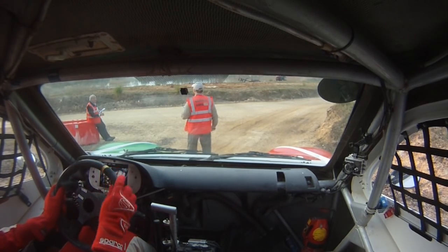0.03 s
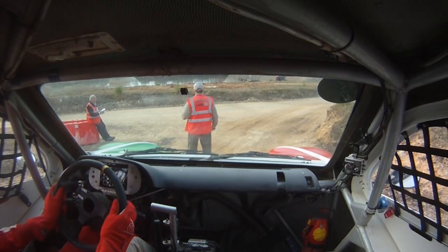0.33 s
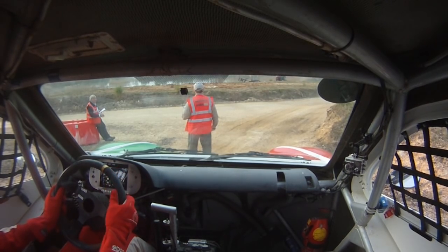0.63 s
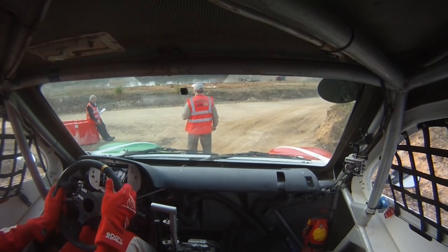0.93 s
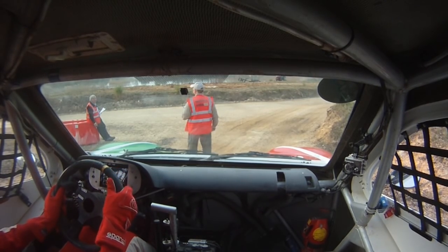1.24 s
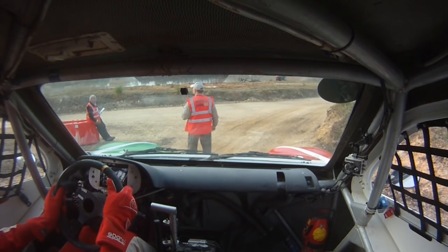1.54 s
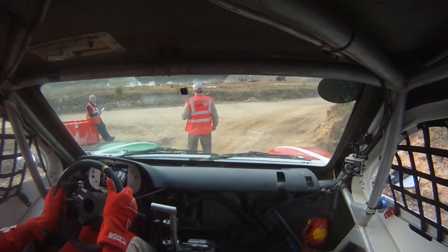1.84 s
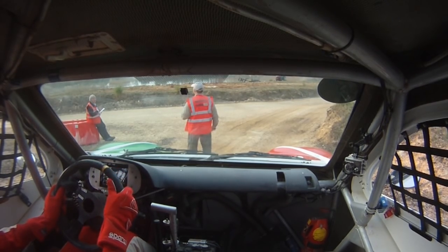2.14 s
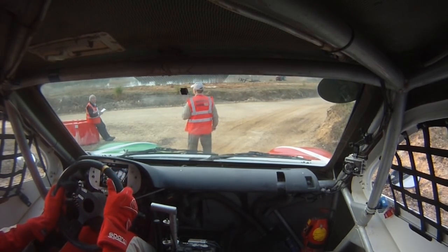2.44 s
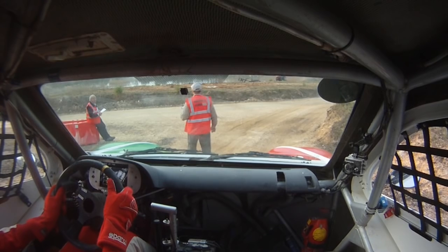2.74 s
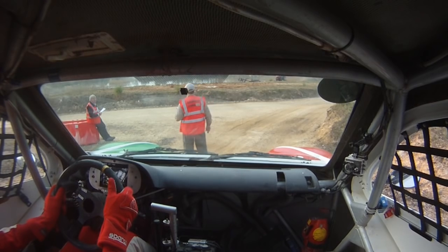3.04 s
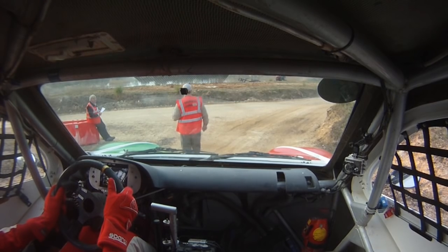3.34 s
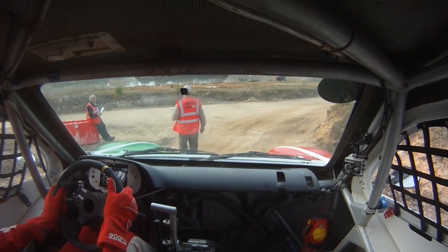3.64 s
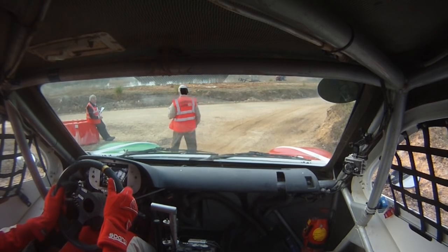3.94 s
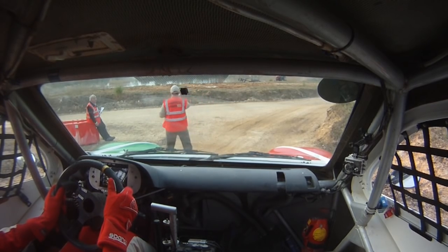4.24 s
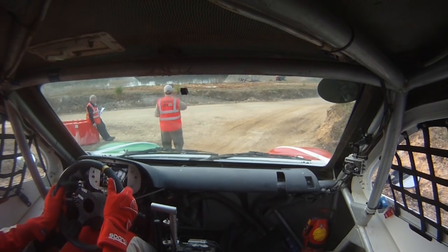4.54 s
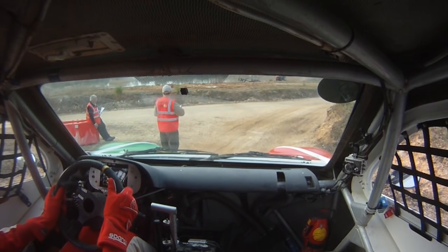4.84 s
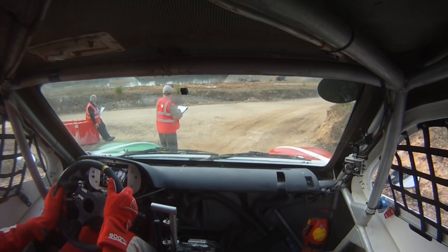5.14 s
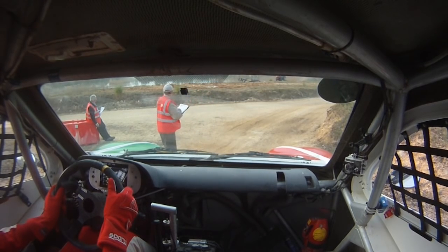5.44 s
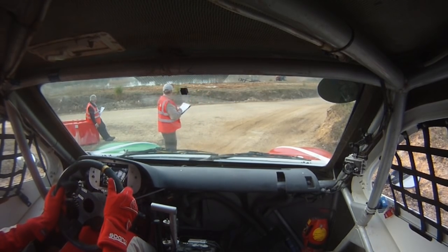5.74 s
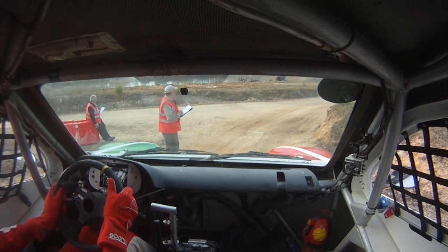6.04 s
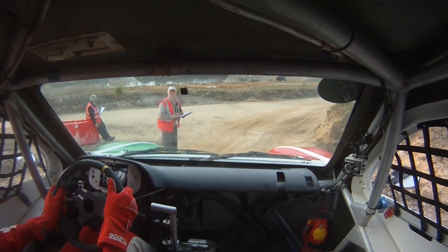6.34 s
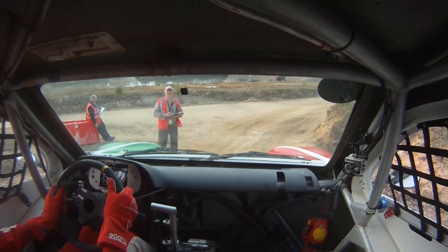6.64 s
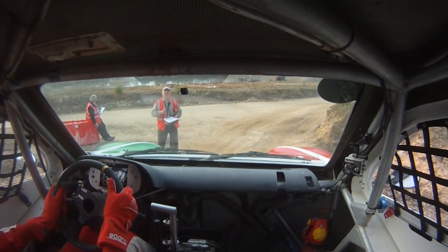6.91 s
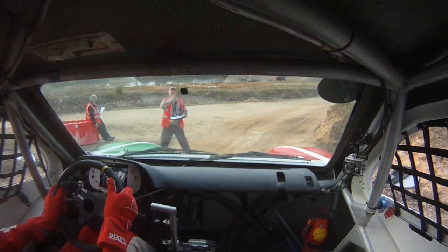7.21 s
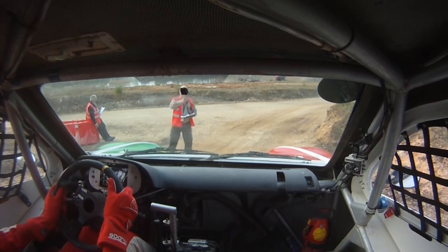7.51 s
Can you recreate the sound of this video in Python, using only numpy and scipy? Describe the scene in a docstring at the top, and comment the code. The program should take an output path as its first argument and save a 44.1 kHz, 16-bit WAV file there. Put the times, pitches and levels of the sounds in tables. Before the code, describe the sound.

A race car's four-cylinder engine idles for the whole stretch, about seven and a half seconds, heard from inside its bare metal cabin. A low, even exhaust boom sets the panels faintly humming. Just as prominent is a fast metallic clatter in the midrange, with a rhythmic knock, lighter valve ticking and a thin, steady gear whine. The idle wavers only slightly, with the boom swelling a little from 1 to 2 seconds and again near 6.8 seconds. A loose tappet adds sharp, bright clicks at irregular moments: right at the start, at about 1.3 seconds, several between 2.6 and 3.3, at 4.4 and 5, at 6.2 and 6.5, then a quick run from 7 to 7.5 seconds. Everything has a close, slightly ringing sheet-metal tone, over faint rumble and hiss.

```python
"""A low exhaust boom fills the bare, caged cabin of a race car, its four cylinders idling near 1340 rpm.
Periodic firing pulses make the boom and set the panels humming. At rates locked to the crankshaft,
the timing drive whines and clatters, the valves tick and two cylinders knock; now and then one loose
tappet clicks louder. The resonances of the sheet-metal cabin and the block colour the impacts."""
import sys
import numpy as np
from scipy import signal
from scipy.fft import rfft, irfft
from scipy.io import wavfile
from scipy.ndimage import uniform_filter1d

SR = 44100
rng = np.random.default_rng(int(sys.argv[2]) if len(sys.argv) > 2 else 0)


def to_wav(s):
    """Save 16-bit WAV."""
    ch = np.atleast_2d(s).T  # columns
    pcm = np.round(np.clip(ch, -1, 1) * 32767)  # PCM
    wavfile.write(sys.argv[1], SR, pcm.astype(np.int16))


N = 338247
TIME = np.arange(N) / SR

# firing rate of the idling engine: t/s, f/Hz
FIRING_RATE = [(0.0, 45.4), (0.25, 43.66), (0.77, 43.68), (1.05, 45.05), (1.74, 45.56), (2.06, 45.34),
               (2.71, 44.23), (2.87, 44.62), (3.18, 43.8), (3.88, 44.72), (3.96, 44.06), (4.7, 43.49),
               (5.24, 43.89), (5.43, 44.97), (6.09, 43.99), (6.82, 45.93), (7.38, 44.45), (7.67, 45.66)]
# partials of the exhaust note: multiple of the firing rate, level/dB at IDLE_HZ
EXHAUST_ORDERS = [(0.75, -86), (1, -44), (1.251, -70), (1.498, -69.5), (2, -66.5), (2.499, -79),
                  (2.75, -82), (3, -62), (4.001, -79)]
# exhaust thumps in the four-firing cycle: place/firings, relative level/dB
EXHAUST_THUMPS = [(0.75, -4.5), (1.75, -5.5), (2.349, 0), (3.78, -2)]
# modes of cabin and engine block: f/Hz, bandwidth/Hz, lift/dB
PANEL_MODES = [(402, 21, 0.5), (499.6, 43, 2.5), (572.5, 23, 9.5), (656.5, 31, 6), (836, 49, 8.5),
               (1085.6, 91, 7), (1306, 46, 8.5), (1448, 43, 10), (1807, 51, 8), (2135, 79, 3),
               (2518, 120, 7), (2868, 75, 8.5), (3236, 220, 5.5), (3830, 270, 11.5), (4190, 265, 9),
               (4840, 140, 10), (5204, 290, 11), (5606, 300, 10.5), (7080, 320, 5), (9360, 430, 8.5)]
# cam follower taps in one crank turn of two firings: place/firings, relative level/dB
FOLLOWER_TAPS = [(.17, -2), (.77, -1.5), (1.0, -2.5), (1.72, 0), (1.89, -4)]
# spectrum of a follower's tap: f/Hz, relative level/dB
FOLLOWER_SPECTRUM = [(500, -15), (1400, -13), (1650, 7.5), (2000, -2.5), (2300, -6.5), (2700, -24.5),
                     (4000, -30.5), (4600, -37), (6500, -50), (15000, -66.5)]
# spectrum of chain patter and rubbing: f/Hz, relative level/dB
CHAIN_SPECTRUM = [(150, -28), (330, -25), (450, -13.5), (740, -16.5), (950, -11.5), (1040, -2.5),
                  (1250, -2.5), (1400, -5), (1550, 0.5), (1870, -5.5), (2250, -12.5), (2700, -29.5),
                  (6500, -48.5), (15000, -61.5)]
# spectrum of a valve meeting its seat: f/Hz, relative level/dB
VALVE_SPECTRUM = [(500, -10), (1500, 14.5), (2550, 2.5), (3000, -1.5), (3600, -4.5), (4050, -11.5),
                  (4500, -8), (5600, -13), (6100, -14), (9000, -20), (15000, -28.5)]
# knocks in the four-firing cycle: place/firings, f/Hz, relative level/dB
CYLINDER_KNOCKS = [(.42, 1347, -5.5), (.76, 1424, -.5), (1.15, 1316, -12), (2.55, 1315, -8),
                   (2.78, 1336, 2), (3.25, 1326, -9), (3.72, 1393, -4)]
# loud clicks of the loose tappet: t/s, relative level/dB
TAPPET_CLICKS = [(0.0765, -50), (1.3414, -50), (2.58, -53), (2.9402, -52), (3.2125, -48), (3.3044, -50),
                 (4.3912, -52), (4.9744, -52), (6.2046, -54), (6.473, -52), (6.998, -50), (7.0868, -55),
                 (7.1761, -50), (7.3555, -48), (7.446, -50)]
# spectrum of such a click: f/Hz, relative level/dB
TAPPET_SPECTRUM = [(1000, -19), (3000, -13), (4400, -5), (4750, -1.5), (5300, 3), (5700, -7), (6100, -21),
                   (9500, -31), (15000, -46)]
# spectrum of cabin rumble and hiss: f/Hz, relative level/dB
CABIN_SPECTRUM = [(20, 22.5), (55, 39.5), (70, 27.5), (100, 31), (190, 18.5), (300, 26), (2000, 6.5),
                  (7000, -2.5), (11000, -4.5), (15000, -4.5)]

IDLE_HZ, TOP_HZ = 44.5, 15150  # nominal firing rate; upper edge of the treble
TEETH_PER_FIRING = 42
VALVE_PLACE, LOOSE_PLACE, LOOSE_DB = .02, 3.40, -7.5  # places/firings; loose tappet re a valve/dB


def undb(db):
    """Amplitude ratio of a level in decibels."""
    return 10 ** (np.asarray(db) / 20)


def level(x, db):
    """Scale a signal to a given rms level."""
    return x * undb(db) / np.sqrt(np.mean(x ** 2))


def walk(rate_hz):
    """Random steps, averaged twice, give a smooth wander with a spread near 1."""
    hold = int(SR / rate_hz)
    steps = rng.standard_normal(4096)[np.arange(N) // hold]
    return 1.3 * uniform_filter1d(uniform_filter1d(steps, hold), hold)


def resonate(x, hz, width_hz, order=1):
    """Damped resonators in series, gain 1 at the centre; each rounds the attack further."""
    for _ in range(order):
        x = signal.lfilter(*signal.iirpeak(hz, hz / width_hz, fs=SR), x)
    return x


def colour(x, spectrum=((1000, 0),), peaks=(), ring=1, size=8192):
    """Minimum-phase filter: resonance peaks, their lifts scaled by `ring`, on a smooth spectrum."""
    f = np.arange(size // 2 + 1) * SR / size
    hz, db = np.transpose(spectrum)
    db = np.interp(np.log(f + 1), np.log(hz), db)
    for centre, width, lift in peaks:
        db = db + ring * lift / (1 + (2 * (f - centre) / width) ** 2)
    cepstrum = irfft(np.log(undb(db)))
    cepstrum[1:size // 2] *= 2  # folding the cepstrum makes the response causal
    cepstrum[size // 2 + 1:] = 0
    response = irfft(np.exp(rfft(cepstrum)))
    return signal.fftconvolve(x, response)[:N]


def repeat(pattern, period):
    """Fill the four-firing cycle with a pattern that recurs every `period` firings."""
    return [(start + place, db) for start in range(0, 4, period) for place, db in pattern]


def blows(firings, pattern, scatter_db, jitter_s, cycles=90):
    """A quasi-periodic impulse train: the pattern recurs every four firings, varying a little."""
    place, db = np.transpose(pattern)
    chance = rng.standard_normal((len(place), cycles, 2))
    due = place[:, None] + 4 * np.arange(cycles)
    onset_s = np.interp(due, firings, TIME, right=-1) + jitter_s * chance[..., 0]
    gain = undb(db[:, None] + scatter_db * chance[..., 1])
    heard = (onset_s > 0) & (onset_s < TIME[-1])
    return np.bincount((onset_s[heard] * SR).astype(int), gain[heard], N)


def chatter(impulses, rise_s, size=1024):
    """Multipath propagation through metal spreads each impulse into a short, spectrally flat burst."""
    age = np.arange(size) / SR / rise_s
    envelope = age * np.exp(-age)
    burst = rng.standard_normal(size)
    for _ in range(3):  # impose the envelope, then flatten the spectrum
        phase = np.angle(rfft(burst * envelope))
        burst = irfft(np.exp(1j * phase))
    return signal.fftconvolve(impulses, burst)[:N]


def exhaust(firings):
    """Periodic forcing gives a note whose weaker orders waver; uneven pulses excite a low cabin mode."""
    note = 0
    for multiple, db in EXHAUST_ORDERS:
        unsteady = .03 if multiple == 1 else .2 if multiple % 1 == 0 else .6
        wander = (walk(7) + 1j * walk(5.2)) / np.sqrt(2)
        phasor = np.sqrt(1 - unsteady ** 2) + unsteady * wander
        partial = np.real(phasor * np.exp(2j * np.pi * multiple * firings))
        note = note - np.sqrt(2) * undb(db) * partial
    pulses = blows(firings, EXHAUST_THUMPS, scatter_db=2.5, jitter_s=.00065)
    thumps = resonate(resonate(pulses, hz=235, width_hz=27), hz=247, width_hz=37)
    return note + level(thumps, -63.5)


def panel_hum(firings):
    """Forced vibration: each of the five lowest modes hums when a firing harmonic drifts onto it."""
    shakes = blows(firings, repeat([(0, 0)], period=1), scatter_db=1, jitter_s=.0001)
    hum = sum(resonate(shakes, hz, .86 * width, order=2) for hz, width, _ in PANEL_MODES[:5])
    return level(hum, -69)


def cabin_noise():
    """Broadband noise, weighted to the bass, is heard as faint rumble and hiss."""
    return level(colour(rng.standard_normal(N), CABIN_SPECTRUM), -64)


def gear_whine(firings):
    """Gear teeth sing at their meshing frequency, swelling as it rises into a panel resonance."""
    mesh = np.cos(2 * np.pi * TEETH_PER_FIRING * firings + .38 * walk(25))
    return level(resonate(mesh, hz=1932, width_hz=55), -56)


def timing_drive(firings, link_count=120):
    """Impact and friction: cam followers tap over chain patter and rubbing that pulse with the load."""
    taps = blows(firings, repeat(FOLLOWER_TAPS, period=2), scatter_db=.9, jitter_s=.00025)
    link_places = 4 * (np.arange(link_count) + rng.random(link_count)) / link_count
    link_db = rng.standard_normal(link_count)
    link_hits = blows(firings, np.c_[link_places, link_db], scatter_db=.8, jitter_s=.0001)
    patter = chatter(link_hits, rise_s=.001186)
    rubbing = rng.standard_normal(N)
    chain = level(patter - patter.mean(), -1.3) + rubbing
    load = undb(np.cos(2 * np.pi * (firings - .1)))  # swings 1 dB either way in each firing
    tapping = colour(taps, FOLLOWER_SPECTRUM, PANEL_MODES)
    clatter = colour(chain * load, CHAIN_SPECTRUM, PANEL_MODES)
    return level(tapping, -52.5) + level(clatter, -43)


def valves(firings, rise_s=.0018):
    """Impacts give contact noise and spring ring: a valve each firing, the loose tappet each cycle."""
    seatings = repeat([(VALVE_PLACE, 0)], period=1) + [(LOOSE_PLACE, LOOSE_DB)]
    hits = blows(firings, seatings, scatter_db=.8, jitter_s=.00025)
    age = np.arange(2048) / SR / rise_s
    envelope = signal.fftconvolve(hits, age * np.exp(-age))[:N]
    contact = colour(envelope * rng.standard_normal(N), VALVE_SPECTRUM, PANEL_MODES)
    spring = resonate(hits, hz=3987, width_hz=510, order=5)
    return level(contact, -61) + level(spring, -70.5)


def knock(firings):
    """Damped resonance: each knock swells and dies at its own pitch; the two loudest go high, low."""
    ringing = 0
    for place, hz, db in CYLINDER_KNOCKS:
        hits = blows(firings, [(place, db)], scatter_db=.6, jitter_s=.0002)
        ringing = ringing + resonate(hits, hz, width_hz=184, order=4)
    return level(colour(ringing, peaks=PANEL_MODES, ring=.3), -44.5)


def loose_tappet():
    """Impulsive excitation: a loose tappet snaps shut, clicking near 5 kHz with a little panel ring."""
    hits = np.zeros(N)
    for onset_s, db in TAPPET_CLICKS:
        hits[int(onset_s * SR)] += undb(db)
    clicks = chatter(hits, rise_s=.00076)
    return undb(23) * colour(clicks, TAPPET_SPECTRUM, PANEL_MODES, ring=.4)


def scene():
    """Superposition: sources locked to the crankshaft add to the loud tappet clicks and cabin noise."""
    firing_hz = np.interp(TIME, *np.transpose(FIRING_RATE))
    firings = np.cumsum(firing_hz) / SR  # engine phase, counted in firings
    surge_hz = firing_hz - IDLE_HZ
    boom = (exhaust(firings) + panel_hum(firings)) * undb(.74 * surge_hz)
    # a faster idle raises the oil pressure, which cushions the valves
    ticking = valves(firings) * undb(-3.5 * np.maximum(surge_hz - .2, 0))
    engine = boom + ticking + knock(firings) + timing_drive(firings) + gear_whine(firings)
    return (engine + loose_tappet() + cabin_noise())[None]


def record(dry):
    """A steep low-pass filter removes the highest treble."""
    return signal.sosfilt(signal.ellip(10, .2, 70, TOP_HZ, fs=SR, output="sos"), dry)


dry = scene()
out = record(dry)
to_wav(out)
```